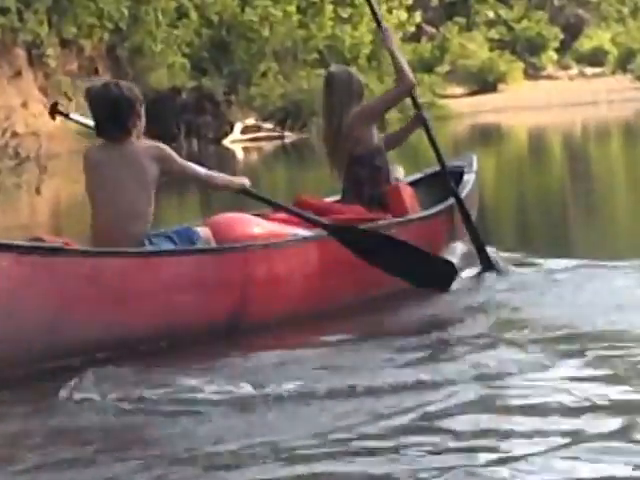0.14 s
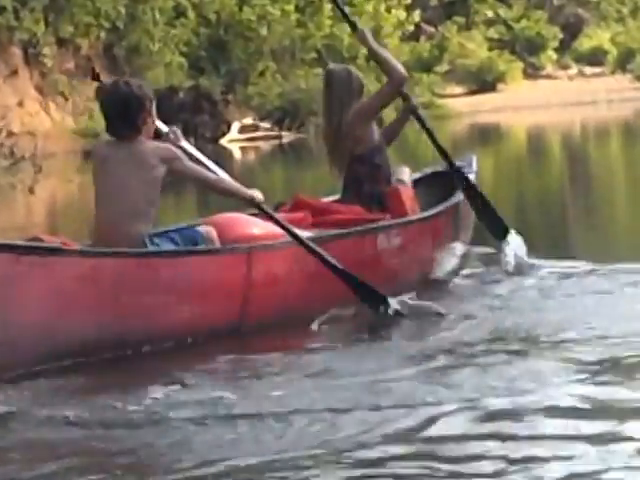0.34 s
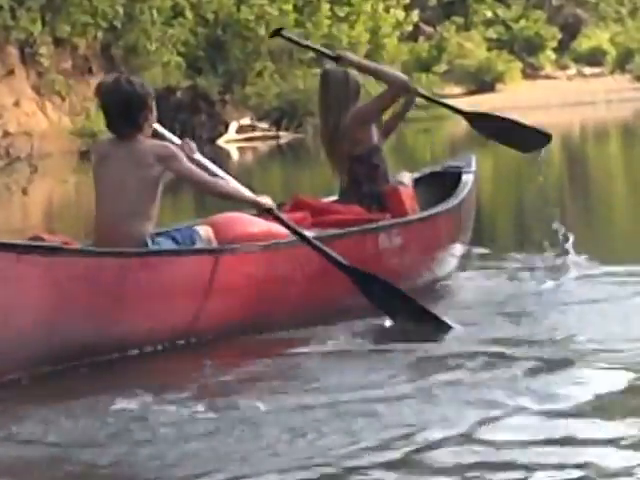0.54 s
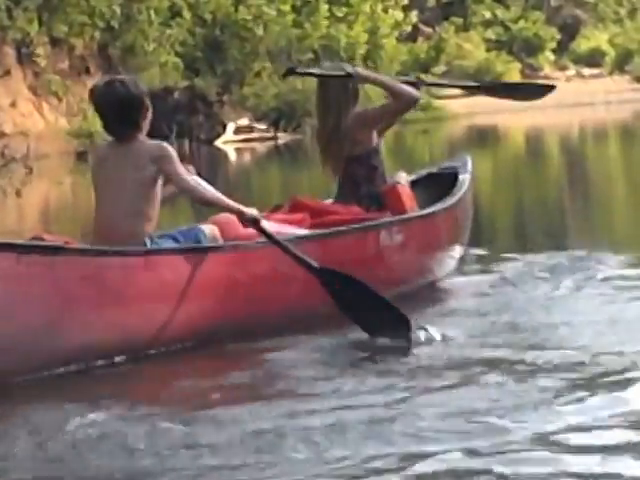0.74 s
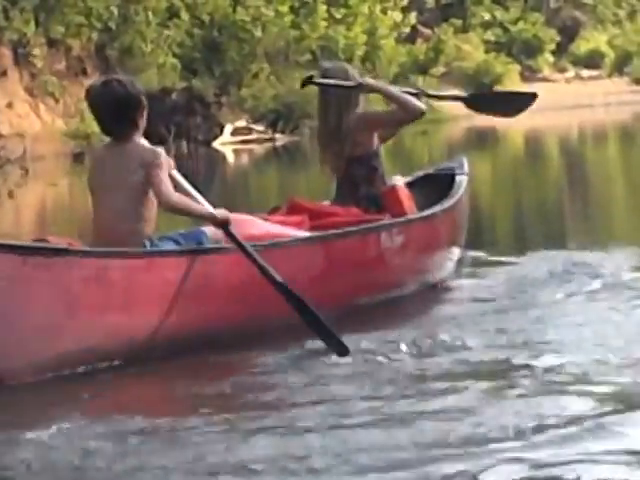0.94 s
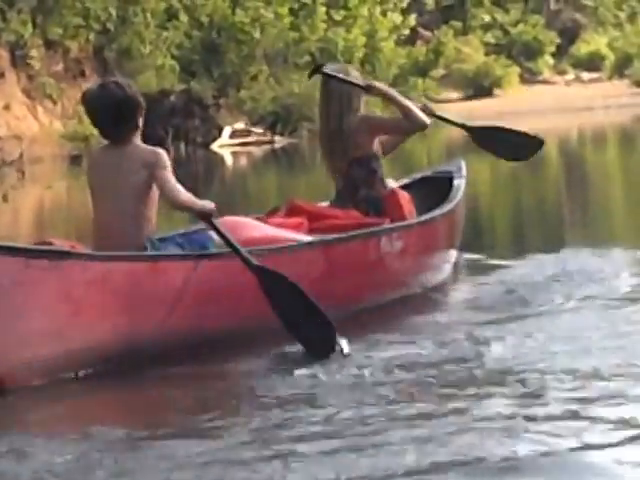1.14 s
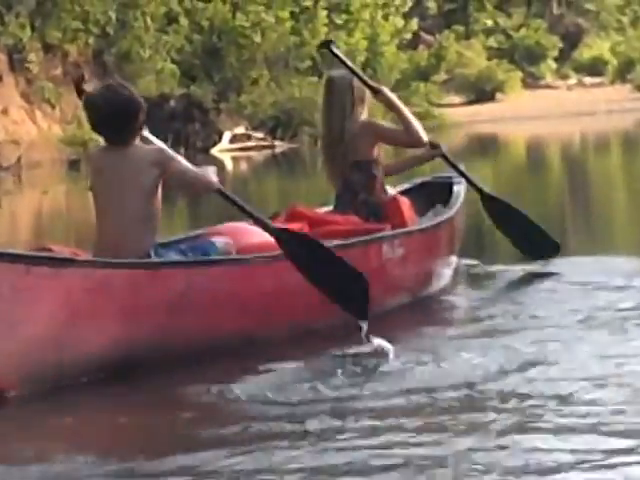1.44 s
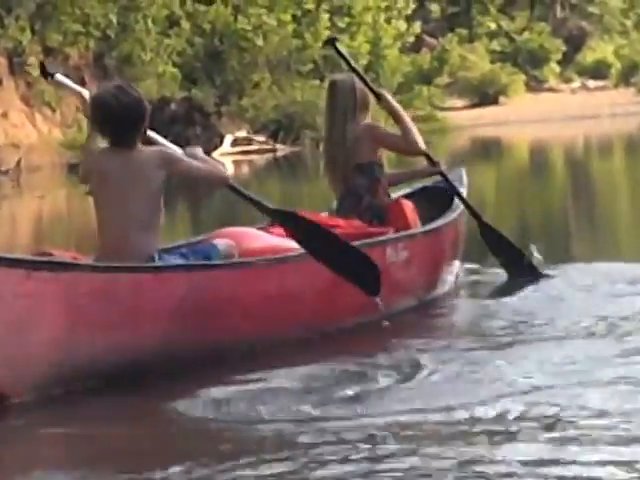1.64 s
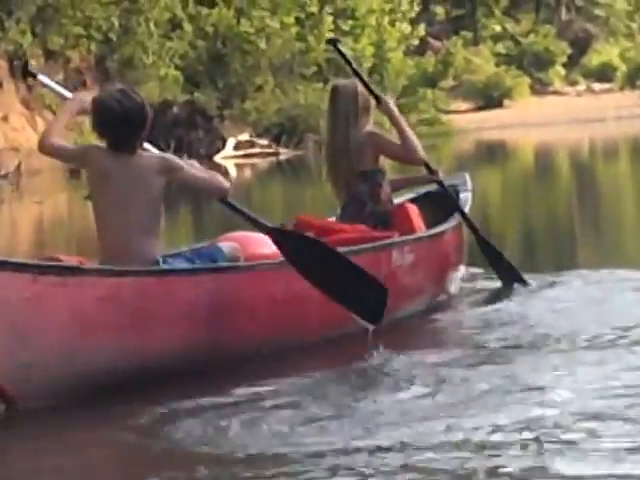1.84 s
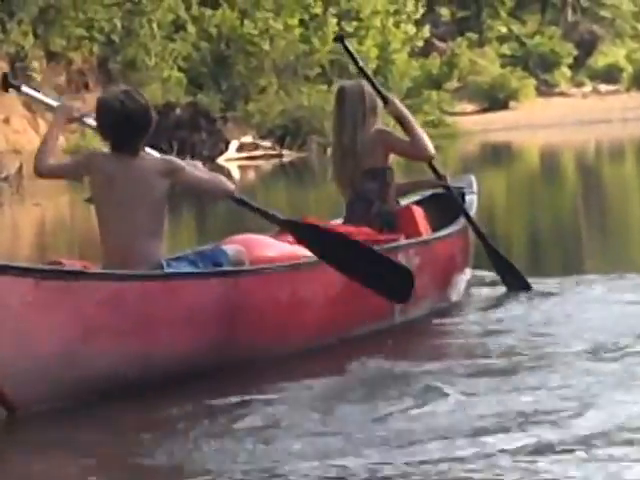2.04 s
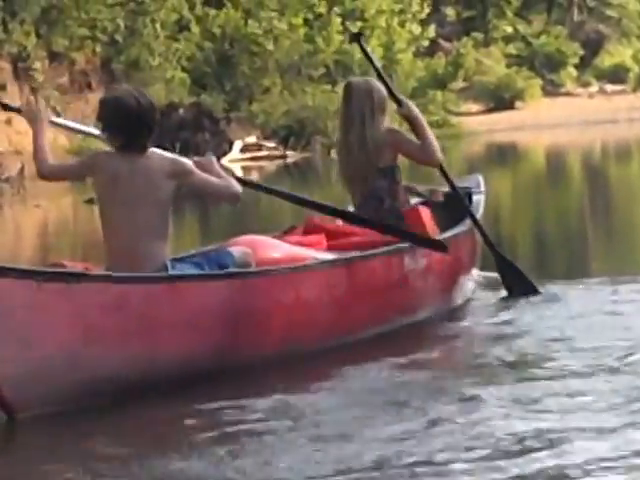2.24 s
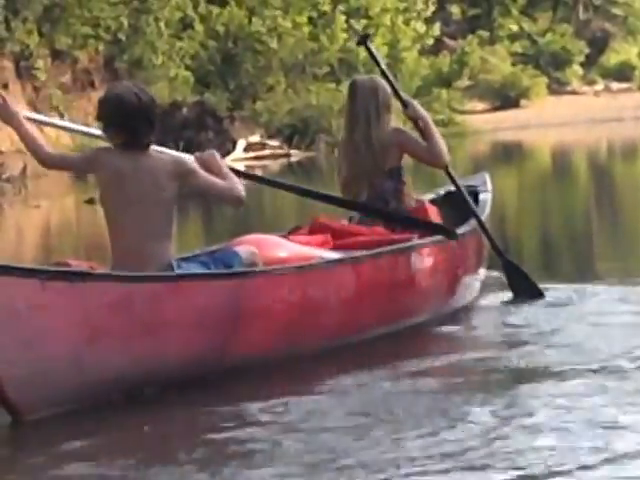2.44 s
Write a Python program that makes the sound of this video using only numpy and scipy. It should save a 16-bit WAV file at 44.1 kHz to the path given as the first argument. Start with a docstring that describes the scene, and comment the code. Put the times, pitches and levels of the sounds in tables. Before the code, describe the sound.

Paddles splash through calm water beside a canoe, close by. At about 0.25 seconds the loudest stroke slaps and gulps, with a shaft knock and hollow hull thump. Soft sloshing, burbling and drips follow, with a small splash near 1.5 seconds. From 2 seconds come another knock and thump, several splashes and louder churning, ending in a short gurgle around 2.5 seconds. A faint outdoor hiss lies underneath.

```python
"""Water sloshes, burbles and fizzes close by, over a faint outdoor hiss: a canoe on a calm creek.
A paddle blade slaps in with a pressure spike and a splash, and the air pocket behind it gulps shut.
The shaft knocks on the gunwale and the hull booms, each in its own modes; spray and drips fall back.
Bubbles ring as damped oscillators, and an eddy's air funnel gurgles behind the last stroke.
Boats and banks return a thin echo, and two closely spaced microphone ports pick it all up."""
import sys
import numpy as np
from scipy import signal
from scipy.fft import rfft, irfft
from scipy.io import wavfile

SR = 44100
rng = np.random.default_rng(int(sys.argv[2]) if len(sys.argv) > 2 else 0)


def persist_wave(psi):
    """Save psi, clipped to +-1, as 16-bit WAV."""
    counts = np.round(np.clip(psi, -1, 1) * 32767).astype(np.int16)
    wavfile.write(sys.argv[1], SR, np.atleast_2d(counts).T)


N = 114660
TIME, FREQ = np.arange(N) / SR, np.fft.rfftfreq(N, 1 / SR)


def amp(db):
    """Decibels to amplitude ratio."""
    return 10 ** (np.asarray(db) / 20)


def unit(x):
    """Normalisation to rms 1."""
    return x / np.sqrt(np.mean(x ** 2) + 1e-20)


def read(points, hz):
    """Interpolation on a log-frequency axis."""
    f, value = np.transpose(points)
    return np.interp(np.log(hz + 1), np.log(f + 1), value)


def add(mix, s, sound):
    """Superposition: a sound joins the mix at time s."""
    part = mix[max(round(s * SR), 0):][:len(sound)]
    part += sound[:len(part)]


def coloured(x, shape_db):
    """Spectral shaping of x, at rms 1."""
    return unit(irfft(rfft(x) * amp(shape_db), N))


def drift(fastest_hz):
    """Low-passed noise: slow random motion, at rms 1."""
    return coloured(rng.standard_normal(N), -10 * np.log10(1 + (FREQ / fastest_hz) ** 6))


def bubble(hz, decay, rise, climb, wobble=0):
    """Damped oscillator: nearing the surface, its pitch rises by the share `climb` per decay time."""
    t = TIME[:int(8 * decay * SR) + 8]
    waver = wobble * drift(fastest_hz=70)[:len(t)] if wobble else 0
    pitch = hz * (1 + climb * t / decay + waver)
    envelope = (1 - np.exp(-t / rise)) * np.exp(-t / decay)
    return envelope * np.sin(2 * np.pi * np.cumsum(pitch) / SR)


def swarm(low_hz, high_hz, per_s, cycles, spread_db, tilt_db, climb, count=28):
    """Poisson process: bubbles of `count` sizes ring at random moments, at rms 1."""
    out = np.zeros(N)
    for hz in np.geomspace(low_hz, high_hz, count):
        births = rng.random(N) < per_s / count / SR
        strength = amp(spread_db * np.minimum(rng.exponential(1, N), 3.5))
        ring = bubble(hz, cycles / hz, .5 / hz, climb)
        tilt = amp(tilt_db * np.log2(hz / low_hz))
        out += tilt * signal.oaconvolve(births * strength, ring / np.linalg.norm(ring))[:N]
    return unit(out)


def water():
    """Bubble resonance falls with size: the stirred wake sloshes low, burbles higher and fizzes on top."""
    # stirred water (time [s], slosh level [dB], burble level [dB], fizz level [dB])
    wake = [(0, -55.5, -52.5, -61), (.18, -62.5, -51.5, -60.5), (0.229, -59, -44.5, -56),
            (.33, -40, -48, -80), (.48, -49, -50, -64.5), (.55, -43, -47, -66), (.6, -83, -52.5, -69),
            (.71, -63, -61.5, -67), (0.748, -48.5, -50.5, -64), (.9, -50, -55, -64),
            (1.0, -50, -51.5, -67.5), (1.199, -47.5, -56, -62), (1.26, -61, -56.5, -62),
            (1.379, -47, -51, -58.5), (1.43, -51.5, -57.5, -67), (1.53, -52.5, -54, -66),
            (1.66, -62, -57, -64), (1.8, -79.5, -66.5, -57.5), (1.87, -52.5, -54.5, -62.5),
            (1.96, -69.5, -74.5, -64.5), (2.039, -49.5, -36.5, -60), (2.15, -39.5, -42, -59.5),
            (2.27, -38.5, -48, -57), (2.4, -38, -41, -54.5), (2.6, -46, -48.5, -62.5)]
    s, *levels = np.transpose(wake)
    slosh, burble, fizz = (amp(np.interp(TIME, s, level)) for level in levels)
    eddies = swarm(170, 403, per_s=470, cycles=0.95, spread_db=4, tilt_db=-1, climb=0.014, count=16)
    froth = swarm(460, 2170, per_s=1100, cycles=3.1, spread_db=1.5, tilt_db=-4, climb=0.061)
    plinks = swarm(776, 4470, per_s=420, cycles=5.5, spread_db=6.5, tilt_db=-3, climb=0.027)
    spray = swarm(1947, 9840, per_s=4000, cycles=2.5, spread_db=3.5, tilt_db=-0.5, climb=0.026)
    lapping = amp(3 * drift(fastest_hz=22.2))  # wavelets make the level flutter
    return slosh * eddies + burble * (amp(-2.5) * froth * lapping + amp(-12) * plinks) + fizz * spray


def hiss():
    """Stationary broadband noise: the faint outdoor background."""
    # hiss spectrum (frequency [Hz], relative density [dB])
    spectrum = [(40, -4.5), (150, -7), (500, -8), (1200, -7.5), (2600, -17.5), (5000, -21.5), (8500, -27.5),
                (11000, -20), (15000, -11)]
    return amp(-55.5) * coloured(rng.standard_normal(N), read(spectrum, FREQ))


def gulps():
    """Minnaert resonance: air dragged under rings as it closes, wavering as the pocket changes shape."""
    # air pockets and large bubbles (time [s], level [dB], pitch [Hz], decay [s])
    pockets = [(.002, -28, 1295, 0.0041), (.2485, 2.5, 487, 0.0014), (0.2519, -15.5, 298, 0.0094),
               (0.2592, -8, 333, 0.0077), (.2654, -23, 371, 0.02), (.425, -34, 1030, 0.0056),
               (0.466, -41, 1065, 0.009), (.554, -33, 530, 0.0037), (.832, -34, 677, 0.0053),
               (1.115, -21.5, 627, 0.0026), (1.167, -32.5, 450, 0.0021), (1.372, -38, 374, 0.025),
               (1.447, -33, 657, 0.012), (1.470, -24.5, 551, 0.0051), (1.599, -41.5, 1270, 0.0044),
               (1.686, -47.5, 890, .008), (1.832, -48, 1442, 0.016), (1.976, -38.5, 1387, 0.0057),
               (2.015, -23.5, 920, 0.0038), (2.072, -12, 1105, .0038), (2.078, -12, 667, 0.0028),
               (2.089, -19, 274.7, .014), (2.097, -18, 163, 0.013), (2.245, -28.5, 490, .015),
               (2.2948, -4, 580, 0.0025), (2.2953, -30.5, 1390, 0.0048), (2.300, -23.5, 212, 0.012),
               (2.303, -25, 425, 0.0042), (2.324, -20, 667, 0.0087), (2.337, -26.5, 218, 0.02),
               (2.409, -26, 443, 0.0039), (2.475, -30.5, 552, .006)]
    out = np.zeros(N)
    for s, db, hz, decay in pockets:
        add(out, s, amp(db) * bubble(hz, decay, rise=0.00098, climb=0.038, wobble=0.024))
    return out


def drips():
    """Air entrainment: each drip traps a tiny bubble that rings high."""
    # drips off the blades (time [s], level [dB], pitch [Hz])
    drops = [(0.104, -43, 1890), (0.1509, -44, 8800), (.613, -45, 11600), (0.894, -41.5, 2330),
             (1.003, -46, 1910), (1.0177, -46, 4840), (1.583, -39, 10050), (1.962, -43, 9200),
             (2.119, -46, 3520), (2.168, -37, 1920), (2.220, -45.5, 6750), (2.277, -42.5, 4000),
             (2.383, -34, 2030)]
    out = np.zeros(N)
    for s, db, hz in drops:
        add(out, s, amp(db) * bubble(hz, decay=11 / hz, rise=.5 / hz, climb=0.038))
    return out


def splashes():
    """Incoherent summation: tiny droplet impacts merge into a band of noise that dies quickly."""
    # slaps, spray and ticks (time [s], level [dB], centre [Hz], skirt [dB/octave], decay [s])
    bursts = [(.203, -41.5, 830, 29, 0.011), (0.2461, -22.5, 2130, 9, 0.0059),
              (.2490, -15.5, 438, 8.5, 0.016), (.276, -37.5, 2600, 7, 0.0068), (.319, -37.5, 800, 21, .008),
              (0.34, -37, 1590, 11, 0.0083), (.382, -44.5, 1870, 14, 0.0089),
              (0.422, -39.5, 1506, 11, 0.0074), (0.557, -47, 1190, 4, 0.0059),
              (.832, -36.5, 540, 12.5, 0.015), (1.115, -42, 610, 8, 0.014), (1.166, -44, 646, 23, 0.0087),
              (1.4697, -30, 860, 7.5, 0.0053), (1.998, -47, 7800, 6, 0.057), (2.015, -32, 2300, 19, 0.01),
              (2.022, -33.5, 2940, 18, 0.0023), (2.0495, -23, 910, 21.5, 0.0049),
              (2.0727, -24.5, 1730, 12, 0.0038), (2.078, -23.5, 594, 11.5, 0.019),
              (2.143, -46, 1590, 6.5, 0.047), (2.2945, -27.5, 2110, 10, 0.0025),
              (2.302, -27, 251, 8, 0.015), (2.396, -35, 800, 11, 0.011), (2.409, -35.5, 700, 10, 0.0059),
              (2.538, -43, 3980, 22, 0.0064), (0.568, -45, 8300, 17, 0.0022),
              (1.773, -40.5, 11900, 31.5, 0.0048), (2.165, -39.5, 11000, 10, 0.006),
              (2.4998, -44, 12000, 31, 0.0034)]
    rise_s, grain_db, rounding_oct = 0.00097, 2, 0.18
    out = np.zeros(N)
    for s, db, hz, skirt, decay in bursts:
        impacts = rng.standard_normal(N) * amp(grain_db * rng.standard_normal(N))
        octaves_away = np.hypot(np.log2((FREQ + 1) / hz), rounding_oct)
        band = coloured(impacts, -skirt * octaves_away)
        envelope = (1 - np.exp(-TIME / rise_s)) * np.exp(-TIME / decay)
        add(out, s, amp(db) * unit(band * envelope) * np.sqrt(np.mean(envelope ** 2)))
    return out


def cracks():
    """Impact transient: first contact with the water is a pressure spike that decays in one cycle."""
    # contacts of a blade or a heavy drop (time [s], peak level [dB], centre [Hz])
    contacts = [(0.2457, -30, 6540), (0.2476, -18.5, 3280), (1.4695, -18.5, 5200), (1.7735, -41.5, 11500),
                (2.0712, -22.5, 5500), (2.166, -41, 11500), (2.3048, -26, 7000)]
    out = np.zeros(N)
    for s, db, hz in contacts:
        spike = np.exp(-TIME * hz) * np.sin(2 * np.pi * hz * TIME)
        add(out, s, amp(db) * spike / abs(spike).max())
    return out


def struck(blows, modes, rise_s, detune):
    """Modal superposition: each blow excites the same damped modes, randomly detuned."""
    out, t = np.zeros(N), TIME[:SR // 2]
    for s, db in blows:
        shifts = 1 + detune * rng.standard_normal(len(modes))
        ring = sum(amp(mode_db - 60 * t / t60) * np.sin(2 * np.pi * hz * shift * t)
                   for (hz, mode_db, t60), shift in zip(modes, shifts))
        add(out, s, amp(db) * ring * (1 - np.exp(-t / rise_s)))
    return out


def shaft():
    """Free vibration: the paddle shaft clacks after striking the gunwale."""
    # knocks on the gunwale (time [s], level [dB])
    knocks = [(.2472, -28), (.277, -37.5), (2.0148, -39), (2.0707, -33.5)]
    # shaft modes (frequency [Hz], level [dB], t60 [s])
    modes = [(932.4, -5.5, 0.19), (1168, -2.5, 0.086), (1510, -4.5, 0.087), (1935, 4, 0.042),
             (2146, 2.5, 0.047), (3127, -2, 0.055), (4000, -34, 0.045), (6940, -20, 0.2)]
    return struck(knocks, modes, rise_s=0.00097, detune=0.02)


def hull():
    """Shell resonance: the hollow hull booms, its modes varying by blow as the waterline shifts."""
    # blows on the hull (time [s], level [dB])
    thumps = [(.2525, -11.5), (0.516, -51.5), (1.179, -42), (2.092, -22), (2.297, -34.5), (2.405, -34)]
    # hull modes (frequency [Hz], level [dB], t60 [s])
    modes = [(95.4, -14, 0.35), (149, -25.5, 0.2), (174.3, -1, 0.18), (197.6, -6, 0.22),
             (300.6, -2.5, 0.15), (372, -2.5, 0.092), (391, -11.5, 0.049), (540.4, 1, 0.078),
             (696, -12, 0.078), (738.6, -10.5, 0.07)]
    return struck(thumps, modes, rise_s=0.0013, detune=0.0039)


def funnel():
    """Randomly driven resonance: turbulence keeps an eddy's air funnel gurgling; it rises, then sinks."""
    # funnel behind the last stroke (time [s], level [dB], pitch [Hz])
    course = [(2.385, -64, 490), (2.411, -37, 517.5), (2.452, -39.5, 537), (2.487, -40.5, 563),
              (2.535, -40, 527.6), (2.59, -66, 530)]
    flutter_hz = 47.3
    s, db, hz = np.transpose(course)
    carrier = np.exp(2j * np.pi * np.cumsum(np.interp(TIME, s, hz)) / SR)
    turbulence = drift(flutter_hz) + 1j * drift(flutter_hz)
    gurgle = unit((carrier * turbulence).real)
    return gurgle * amp(np.interp(TIME, s, db)) * (TIME > s[0])


def echo(x):
    """Reverberation: scattered reflections form an exponentially decaying tail."""
    # echo off boats and banks (frequency [Hz], t60 [s])
    decay_times = [(150, 0.46), (600, 0.063), (2000, 0.3), (9000, 0.36)]
    hz, t, noise = signal.stft(rng.standard_normal(SR // 2), SR, nperseg=256)
    fade = amp(-60 * t / read(decay_times, hz)[:, None])
    tail = signal.istft(noise * fade, SR, nperseg=256)[1]
    return signal.fftconvolve(x, tail / np.linalg.norm(tail))[:N]


def scatter(x):
    """Decorrelation: each microphone port also receives an echo of its own."""
    # spectrum of the unshared echo (frequency [Hz], gain [dB])
    spectrum = [(100, -19), (700, -2.5), (1500, -19), (2500, -29.5), (12000, -18)]
    echoes = np.array([echo(x), echo(x)])
    return irfft(rfft(echoes) * amp(read(spectrum, FREQ)), N)


def ports(x):
    """Phase and level differences: two close microphone ports hear one sound slightly differently."""
    # the left port's lead in the bass (frequency [Hz], phase [rad])
    bass_lead = [(40, 1.8), (90, 1.7), (172, 1.27), (300, .7), (520, .25), (1300, 0)]
    # balance of the ports (frequency [Hz], left minus right [dB])
    balance = [(60, -1), (200, -1), (500, -4), (1500, 0), (9000, -0.2)]
    lag_s, lag_from_hz = 1 / 2600, 1300
    lead = read(bass_lead, FREQ) - 2 * np.pi * lag_s * np.maximum(FREQ - lag_from_hz, 0)
    left = np.exp(.5j * lead) * amp(read(balance, FREQ) / 2)
    return irfft(rfft(x) * np.array([left, 1 / left]), N)


def scene():
    """Superposition of strokes, wake, echo and hiss at the two ports."""
    near = cracks() + splashes() + gulps() + drips() + funnel() + hull() + shaft() + water()
    unshared_echo = scatter(near)
    shared = ports(near + amp(-17) * echo(near) + hiss())
    return shared + unshared_echo + amp(-33) * np.array([hiss(), hiss()])


def record(dry):
    """Frequency response: the microphone thins the deep bass and top treble, and the band is limited."""
    # microphone response (frequency [Hz], gain [dB])
    response = [(3000, -1), (8500, 2.0), (11500, -8), (15000, -20)]
    low_cut_hz, edge_hz = 105, 15400
    shaped = irfft(rfft(dry) * amp(read(response, FREQ)), N)
    thinned = signal.sosfilt(signal.butter(3, low_cut_hz, "highpass", fs=SR, output="sos"), shaped)
    band_limit = signal.firwin(511, edge_hz, window=("kaiser", 9), fs=SR)
    return signal.oaconvolve(thinned, band_limit[None], "same")


dry = scene()
out = record(dry)
persist_wave(out)
```